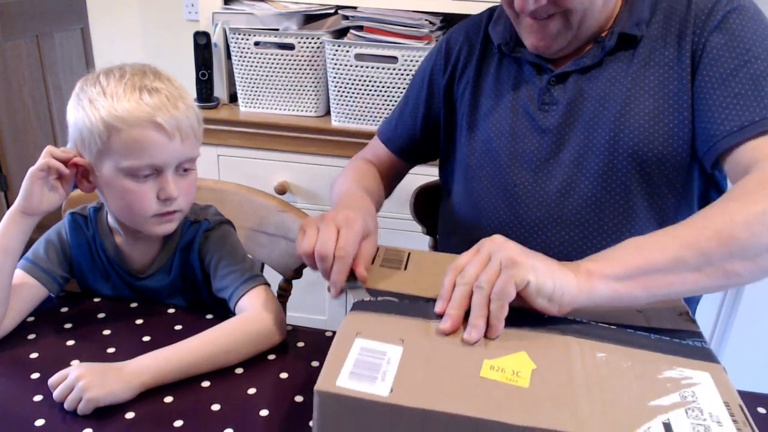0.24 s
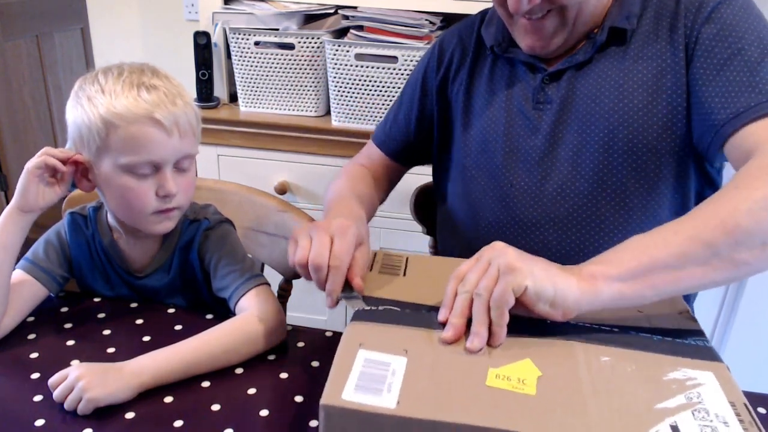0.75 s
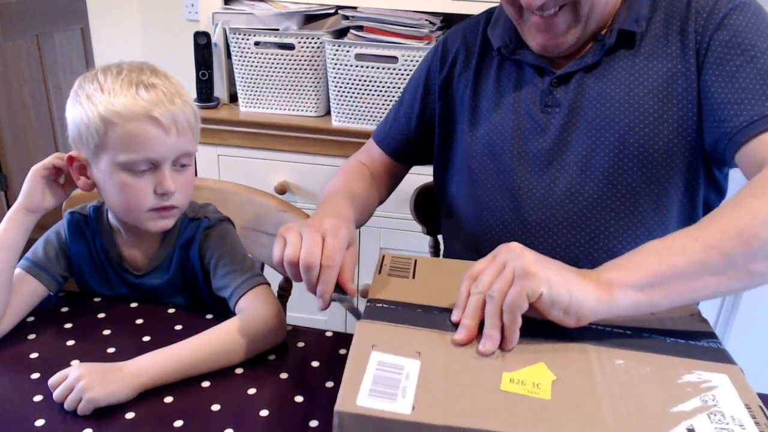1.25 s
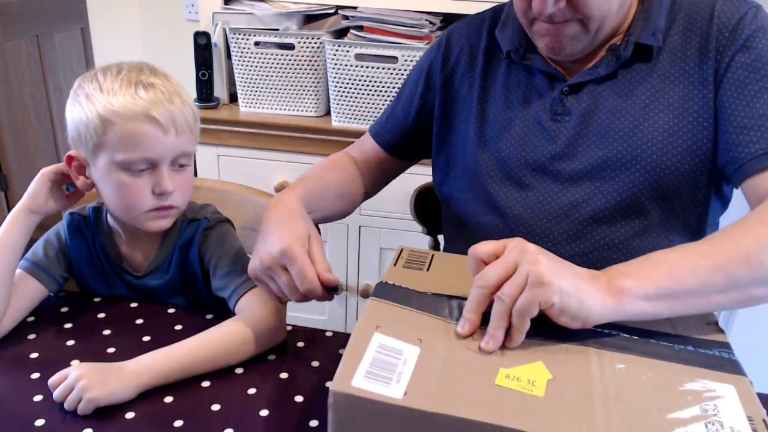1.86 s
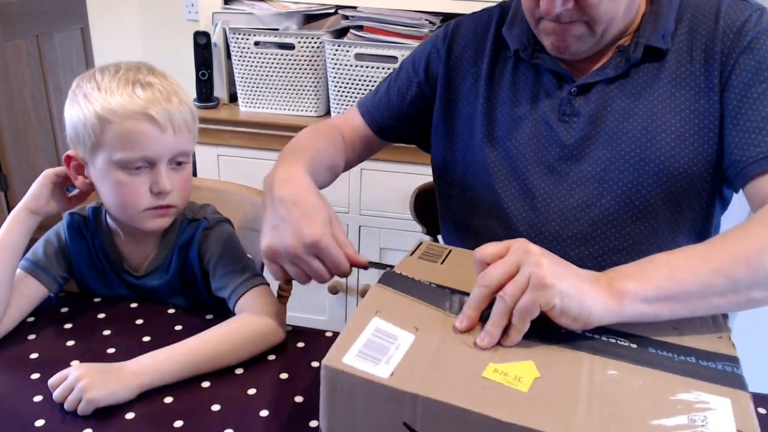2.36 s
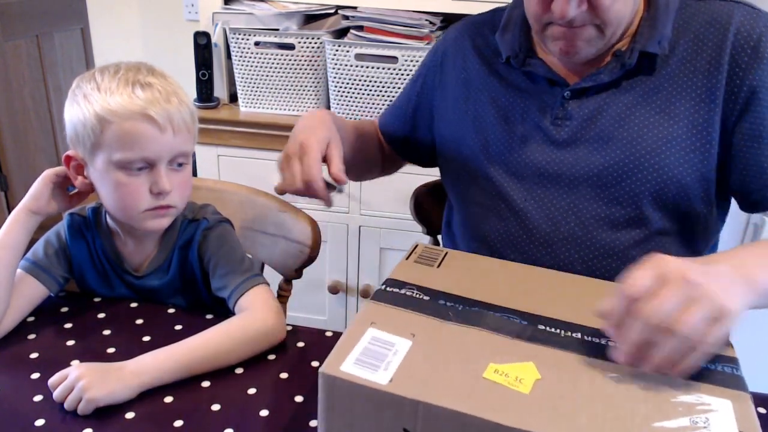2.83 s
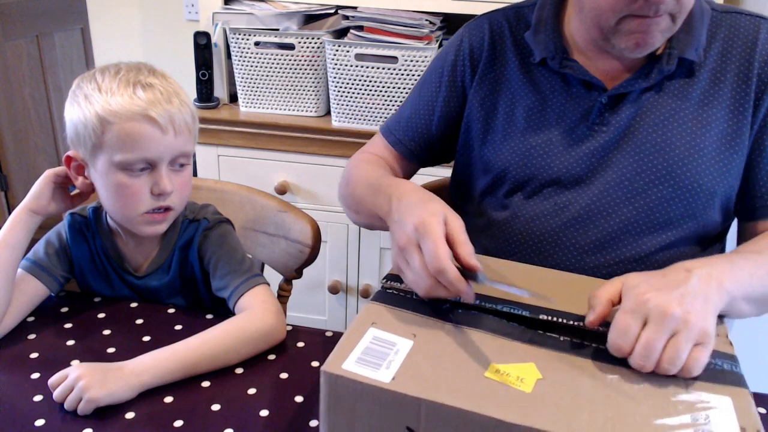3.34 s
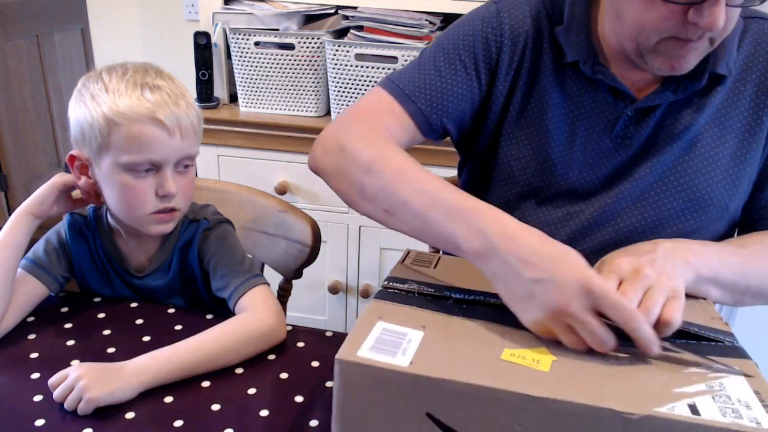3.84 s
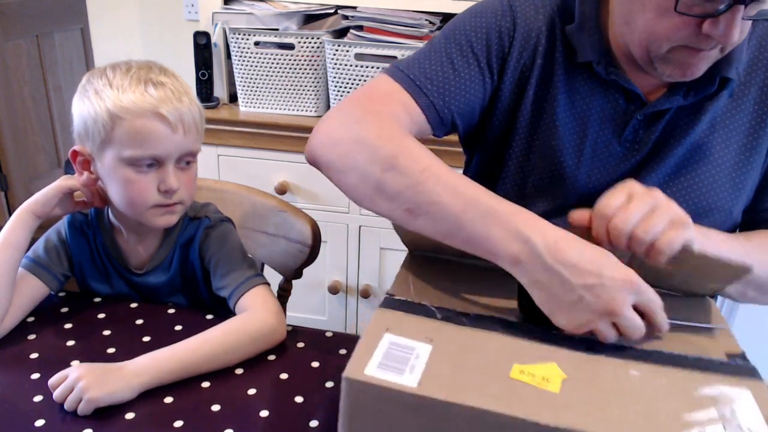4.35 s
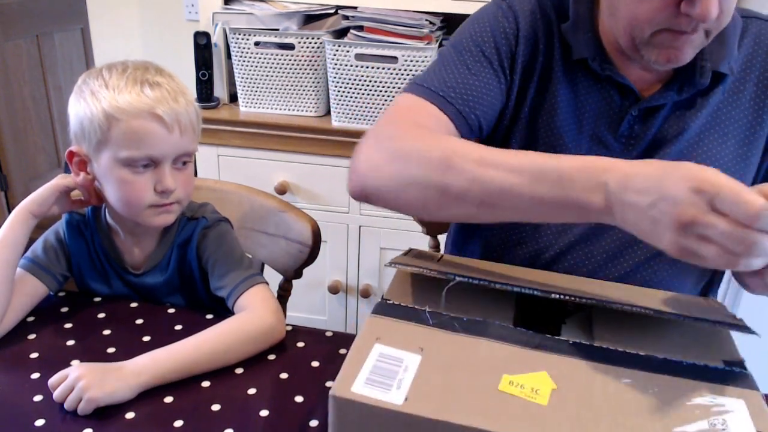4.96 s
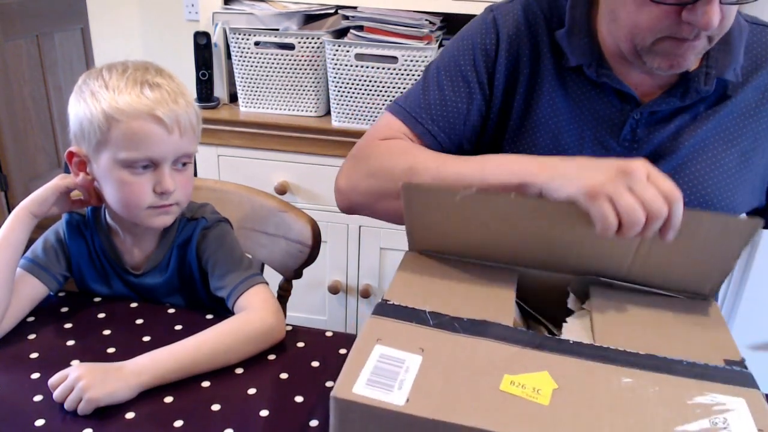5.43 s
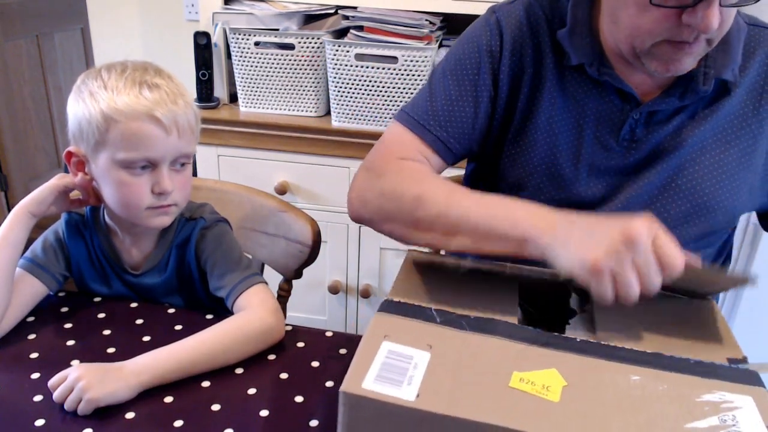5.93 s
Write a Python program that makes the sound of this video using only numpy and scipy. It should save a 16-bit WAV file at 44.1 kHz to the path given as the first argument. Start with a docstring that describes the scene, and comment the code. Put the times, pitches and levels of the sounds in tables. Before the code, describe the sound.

Close cardboard box opening: short knife rasps, popping tape, boomy knocks, a loud ripping crack, then quieter scrapes and thin folding knocks.

```python
"""A kitchen table in a small room: a knife saws through a cardboard box's packing tape and slits the seam,
then the flaps are torn free and folded back. Stick-slip strokes and sudden snaps drive one box:
its hollow booms, its walls knock, the board rasps, edge and tape hiss. Squeaks of narrow noise, a low
judder of summed sines and one dry, bright overload burst lie on top. Soft air and a faint hum run
throughout. A close pair of microphones hears it; the last folds and knocks sound thinner."""
import sys
import numpy as np
from scipy import signal
from scipy.fft import rfft, irfft, next_fast_len
from scipy.io import wavfile
from scipy.ndimage import uniform_filter1d

SR = 44100
rng = np.random.default_rng(int(sys.argv[2]) if len(sys.argv) > 2 else 0)


def materialize(psi):
    """Save the field psi as 16-bit PCM at rate SR to the path in sys.argv[1].

    A 1-D psi becomes a single channel; in a 2-D psi each row is a channel.
    """
    bounded = np.clip(np.atleast_2d(psi).T, -1, 1)
    quanta = np.round(bounded * 32767).astype(np.int16)
    wavfile.write(sys.argv[1], SR, quanta)


N = 272979
TIME = np.arange(N) / SR

# registers of the box, in order hollow, walls, board, edge: low_hz, high_hz
REGISTERS = [(36, 240), (240, 520), (520, 2400), (2400, 17000)]
# registers for snaps, with the top split into edge and tape: low_hz, high_hz
SNAP_REGISTERS = [(45, 240), (240, 520), (520, 2400), (2400, 8000), (8000, 17000)]

# Strokes press in, sag while held and let go. full_s is when the press is full.
# Levels are before each register's trim; boom (hollow), knock (walls) and hiss (edge) count from level_db (board).
# short sawing strokes at the end of the seam: full_s, hold_s, level_db, boom_db, knock_db, hiss_db
SAWING_STROKES = [(0.02, .03, -42.5, -3.5, 5.5, -1.5), (0.15, .025, -51.5, 1, -11, -3.5),
                  (0.255, 0.042, -49.5, 9.5, 12.5, -10), (0.38, .02, -57.5, -10, 2.5, -5.5),
                  (0.485, .025, -38.5, 6.5, 9.5, -2), (0.62, .05, -56, 6, 8.5, -4),
                  (0.725, .02, -43.5, 13.5, 1, -5), (0.84, .02, -52.5, 9, 1, 1),
                  (0.885, 0.0046, -44, 4, 0.5, -2.5), (0.965, .02, -37, 1, 6, -0.5),
                  (1.0, .015, -25.5, -6, 7.5, -4.5), (1.08, .025, -35.5, -26, -6, -2)]
# the blade pushed through the tape and drawn along it: full_s, hold_s, level_db, boom_db, knock_db, hiss_db
SLITTING_STROKES = [(1.14, 0.066, -21.5, -13, 3.5, -8), (1.235, 0.0069, -26.5, -4, -0.5, -8),
                    (1.285, 0.074, -42.5, -0.5, 0.5, -5), (1.435, 0.0033, -46, -1, 1, -13),
                    (1.548, 0.012, -40.5, 8.5, 20.5, -10), (1.615, 0.062, -41, -1, 9.5, -19),
                    (1.695, 0.0062, -27, -1, 2, -10.5), (1.84, 0.09, -56, -8, 6.5, -12.5),
                    (1.945, 0.054, -45.5, 1.5, 9, -17.5), (2.11, .07, -36, 10.5, 9.5, -11),
                    (2.2, 0.028, -19, 3.5, 6.5, -13), (2.26, 0.032, -33, 9, 6, -14.5),
                    (2.36, 0.049, -41.5, 14.5, 17.5, -8.5), (2.45, 0.075, -53.5, -6, -13, -6.5),
                    (2.56, 0.015, -39, -12, -7, -1), (2.61, 0.01, -58, 18.5, 5, -5.5),
                    (2.8, 0.039, -64.5, 11.5, -5, -11), (2.875, 0.0034, -48.5, 7, -4.5, -3.5),
                    (2.975, 0.076, -29.5, 2, 0.5, -13.5), (3.095, 0.082, -45, 0.5, -13, -5.5),
                    (3.205, 0.039, -42, 7, -6.5, -6.5), (3.28, .06, -53.5, -8, 0.5, -2),
                    (3.405, 0.063, -47, 1, 6.5, -5.5), (3.47, 0.079, -47, -13, 5, -1),
                    (3.58, 0.095, -60, 5.5, -6, 8.5), (3.745, 0.015, -46, 8.5, 7, -2),
                    (3.8, 0.066, -55.5, -11, -19, -0.5), (3.885, 0.028, -50, 10, 14, -7)]
# the flaps tear free and rub as they fold: full_s, hold_s, level_db, boom_db, knock_db, hiss_db
FLAP_STROKES = [(3.968, .012, -27, 0, -2, -10.5), (4.0, 0.027, -15.5, -6.5, -2.5, -11.5),
                (4.105, 0.028, -33, -13, 7.5, -6.5), (4.17, 0.013, -18.5, 5.5, 3.5, -14.5),
                (4.23, 0.052, -34.5, 10, 1, -14), (4.44, 0.014, -41, 0.5, 0.5, -13),
                (4.55, .03, -66, 6, -3, -5), (5.12, 0.023, -50, 15.5, -0.5, -3.5),
                (5.22, .05, -63, -2.5, 1, -2.5), (5.34, 0.067, -77, -3, 7, -5),
                (5.46, 0.028, -60.5, 1, 5.5, -19), (5.52, 0.11, -45.5, 0.5, 5, -14),
                (5.645, 0.075, -38, -5, 4, -8.5), (5.85, 0.03, -43.5, 16, -2, -10.5),
                (5.885, 0.011, -30, 11.5, 7, -12), (5.97, 0.1, -39.5, 5, 7, -7),
                (6.155, .04, -37.5, 13.5, 4, -4)]
# tape snaps and knocks, levels before trim; ring_hz is the struck panel's pitch:
# start_s, level_db, boom_db, knock_db, hiss_db, ring_hz, crackle_s
SNAPS = [(0.017, -38.5, -29, -23, -8, 1340, 0.0083), (0.483, -39, -5, 4, -6, 1080, 0.0037),
         (0.69, -62.5, 17, 24, 0, 880, 0.0029), (0.713, -33.5, -5, 1.5, -7, 1770, 0.011),
         (1.113, -22.5, 3, 1, -7.5, 2240, 0.0059), (1.127, -13.5, -2.5, -0.5, -12.5, 2370, 0.0011),
         (1.149, -27, -18, 8.5, -8.5, 654, 0.036), (1.157, -26, -4, 8.5, -10, 345, 0.0053),
         (1.238, -30.5, 16, -19, -4.5, 555, 0.0049), (1.317, -40.5, -25, 5.5, 1.5, 576, .004),
         (1.535, -59, 12, 15, -15, 324, .008), (1.66, -13, -14, -20, -9, 2295, .002),
         (1.685, -21, -10, -11.5, -4.5, 1100, 0.0011), (2.093, -39.5, 21, 9.5, -6, 345, 0.0087),
         (2.144, -31, 1, 10.5, -7.5, 530, .005), (2.186, -17.5, 0.5, 5.5, -11, 1025, 0.01),
         (2.203, -36, 23, 5, -4, 620, 0.0056), (2.223, -21, -15, -8, -16, 606, 0.0085),
         (2.345, -31.5, 15.5, 13, -15, 332, 0.0048), (2.948, -33, -26, -18, -6, 2310, 0.0058),
         (3.016, -19, -33, -5, -14, 623, 0.0075), (3.099, -38, -12, -21, -6, 840, .0015),
         (3.14, -46, -6, -5, -1, 770, 0.0034), (3.191, -27, -12, -22, -7.5, 810, 0.0041),
         (3.333, -61.5, -10, -1, 9.5, 2336, 0.0043), (3.507, -29.5, 3, 1.5, -15, 760, .006),
         (3.727, -50.5, 13.5, 0.5, 0, 1030, 0.02), (3.939, -24.5, 8.5, 5.5, 0.5, 1070, 0.0083),
         (3.947, -22, 14.5, 7.5, -15.5, 1060, 0.0079), (3.977, -15.5, 2.5, 5.5, 0, 864, .008),
         (3.985, -16.5, -6.5, -11.5, -4.5, 1080, 0.0033), (4.084, -14.5, -28.5, -3, -17.5, 923, .002),
         (4.15, -15.5, 4.5, -5, -14, 1220, 0.0041), (4.157, -18, -1.5, 7, -14, 925, 0.0074),
         (4.248, -43, 25, -12, -12, 945, 0.0023), (5.087, -54, 26.5, 14, -12, 670, 0.0077),
         (5.616, -38, 12.5, -4, -13.5, 960, 0.008), (5.706, -34, -6, -9, -14, 816, .003),
         (5.848, -45.5, 19, -7, -20, 660, 0.0058), (5.889, -39.5, 23.5, 8, -3, 590, 0.0056),
         (6.032, -33.5, -9, 5, -16.5, 570, 0.0021), (6.13, -56.5, 31, 26, -2, 950, 0.0021),
         (6.156, -32.5, 7, 5.5, -1.5, 594, 0.015)]
# the blade judders along the seam and slows: time_s, slips_per_s, level_db
JUDDER = [(3.507, 117, -47), (3.518, 133, -24.5), (3.549, 105, -29), (3.575, 86, -47), (3.60, 87, -36),
          (3.64, 99, -33.5), (3.68, 72, -40), (3.72, 82, -52)]
# rough squeaks where the blade or a flap edge binds, levels before a shared trim:
# centre_s, half_length_s, pitch_hz, width_hz, level_db
SQUEAKS = [(0.487, 0.0044, 6120, 600, -31.5), (0.99, 0.014, 6080, 900, -30.5),
           (1.625, 0.0024, 1790, 260, -33.5), (3.197, 0.0075, 3300, 305, -33.5),
           (3.201, 0.0081, 840, 120, -32), (3.483, 0.043, 730, 181, -41), (3.523, 0.028, 1360, 247, -44),
           (4.123, 0.028, 878, 194, -29), (5.111, 0.014, 654, 45, -45), (5.544, 0.017, 1433, 199.8, -53.5),
           (5.615, 0.0072, 1600, 350, -45.5), (5.706, 0.0015, 7540, 700, -43)]

# broad colour of the sawing contact: pitch_hz, level_db
SAW_COLOUR = [(15, -53), (25, -25.5), (64, -23.5), (216, -8.5), (307, -14), (351, -4), (402, -14),
              (541, -11), (789, -22), (2200, -25), (4550, -20.5), (6290, -17.5), (8470, -37.5),
              (9950, -31.5), (15700, -42.5)]
# broad colour of the slitting contact: pitch_hz, level_db
SLIT_COLOUR = [(15, -45.5), (25, -21), (76, -16), (140, -4.5), (291, -12.5), (342, -3.5), (448, -11.5),
               (619, -14), (879, -21.5), (1060, -21.5), (1280, -29), (1720, -28), (6290, -24),
               (8020, -34.5), (15700, -44.5)]
# broad colour of the rubbing flaps: pitch_hz, level_db
FLAP_COLOUR = [(15, -58.5), (25, -15), (148, 1), (199, -7.5), (307, -9.5), (342, -13.5), (413, -10),
               (486, -13.5), (708, -16.5), (1010, -17.5), (1820, -24.5), (2320, -34), (6460, -31),
               (8240, -45), (15700, -57)]
# broad colour of the snaps: pitch_hz, level_db
SNAP_COLOUR = [(15, -53.5), (25, -18.5), (70, -22.5), (144, -1.5), (179, -2), (342, -6), (402, -10.5),
               (653, -8), (708, -10.5), (1030, -11), (1350, -12), (3040, -31.5), (5500, -29.5), (8700, -41),
               (15700, -49)]
# resonances of the box: pitch_hz, width_hz, lift_db
BOX_MODES = [(111, 5.3, 0), (146.3, 15, 5.5), (220, 48, 2.5), (348, 33, 6.5), (534, 78, -3), (677, 14, 5),
             (840, 7.7, 6), (1030, 78, 3.5), (1115, 16, -0.5), (1490, 130, 3), (1880, 31, 4), (2254, 50, 6),
             (3390, 35, -0.5), (4900, 67, 5), (7160, 1400, 2.5)]

# reverberation time of the room: pitch_hz, t60_s
ROOM_T60 = [(100, 0.13), (500, 0.16), (2000, 0.23), (6000, 0.19), (15000, 0.22)]
# echo against direct sound: pitch_hz, level_db
ECHO_LEVEL = [(60, 7.5), (130, -17), (400, -8.5), (1200, -1), (4000, -1.5), (7000, -4.5), (9500, -8.5),
              (14000, -1.5)]
# left-right likeness of the echo: pitch_hz, correlation
ECHO_LIKENESS = [(60, 0.45), (130, 0.55), (400, 0.29), (1000, 0.4), (2200, -0.14), (5000, -0.18),
                 (14000, 0.85)]
# colour of the still air, relative: pitch_hz, level_db
AIR_COLOUR = [(15, -41), (25, -6.5), (70, 0), (107, 9.5), (170, -13.5), (216, -8), (241, -10.5),
              (371, -13.5), (1630, -22.5), (2960, -40), (15700, -35.5)]
# faint appliance hum: pitch_hz, level_db
HUM = [(107.7, -89.5), (145.3, -87.5), (215.3, -78.5)]

AIR_DB = -69.5
TAPE_BELOW_EDGE_DB = 15.5  # the thin sizzle of the tape follows the hiss of each snap, before trim
BURST_S, BURST_SPREAD_S, BURST_NOISE_DB = 3.988, 0.0029, -12.5  # noise level is before its high-pass
THIN_S, THIN_LOW_HZ = 5.9, 98  # from here on there is little deep bass
PAN_DB = -0.55  # left minus right: the box stands a little to the right
CUTOFF_HZ = 16000


def from_db(db):
    """Decibels to gain."""
    return 10 ** (np.asarray(db) / 20)


def at_hz(points, hz):
    """Read a spectrum on a log-frequency axis."""
    points = np.array(points)
    return np.interp(np.log(np.maximum(hz, 1)), np.log(points[:, 0]), points[:, 1])


def gate(s, fade_s):
    """One from the first to the last of the times s, with short ramps outside."""
    return np.interp(TIME, [s[0] - fade_s, s[0], s[-1], s[-1] + fade_s], [0, 1, 1, 0])


def drift(per_s):
    """Random wander: straight lines between per_s normal draws each second."""
    return np.interp(TIME * per_s, np.arange(1000), rng.standard_normal(1000))


def resonate(x, hz, width_hz):
    """One resonance, gain about one at its top."""
    r = np.exp(-np.pi * width_hz / SR)
    feedback = [1, -2 * r * np.cos(2 * np.pi * hz / SR), r * r]
    return signal.lfilter(np.array([1, 0, -1]) * (1 - r * r) / 2, feedback, x)


def two_ears(mid, side, alike):
    """Left and right from two unrelated signals, with a given likeness."""
    alike = np.clip(alike, -.99, .99)
    middle = np.sqrt(1 + alike) * mid
    width = np.sqrt(1 - alike) * side * np.array([[1], [-1]])
    return (middle + width) / np.sqrt(2)


def room_tone(alike):
    """Still air is coloured noise in both ears; the hum is a few steady sines."""
    size = next_fast_len(N, True)
    hz = np.arange(size // 2 + 1) * SR / size
    white = rfft(rng.standard_normal((2, size)))
    air = irfft(white * from_db(at_hz(AIR_COLOUR, hz)), size)[:, :N]
    hum = sum(np.sqrt(2) * from_db(db) * np.sin(2 * np.pi * f * TIME) for f, db in HUM)
    return from_db(AIR_DB) * two_ears(*air / np.std(air), alike) + hum


def room(lag_s, build_s=0.0022, size=16384):
    """Stereo response: direct sound, reaching the left lag_s later, then echoes dying band by band."""
    t, hz = np.arange(size) / SR, np.arange(size // 2 + 1) * SR / size
    white = rfft(rng.standard_normal((2, size)))
    edges = np.geomspace(25, 20000, 19)
    arrival_s = np.array([[lag_s], [0]]) + 16 / SR
    out = irfft(np.exp(-2j * np.pi * hz * arrival_s))
    for low, high in zip(edges, edges[1:]):
        centre = np.sqrt(low * high)
        decay = from_db(-60 * t / at_hz(ROOM_T60, centre))
        build = 1 - np.exp(-t / build_s)
        tail = irfft(white * ((hz >= low) & (hz < high))) * decay * build
        # energy in step with the band's share of the direct click
        tail *= np.sqrt(2 * (high - low) / SR / np.sum(tail ** 2, axis=1, keepdims=True))
        out += from_db(at_hz(ECHO_LEVEL, centre)) * two_ears(*tail, at_hz(ECHO_LIKENESS, centre))
    return out


def box_responses(colour, space, registers=REGISTERS, size=16384):
    """How each register of the box answers one click, heard through the room; unit energy."""
    hz = np.arange(size // 2 + 1) * SR / size
    modes_db = sum(lift / (1 + (2 * (hz - f) / width) ** 2) for f, width, lift in BOX_MODES)
    shape_db = at_hz(colour, hz) + modes_db
    # minimum phase: the board rings only after it is touched
    cepstrum = irfft(np.log(from_db(shape_db)))
    ring = irfft(np.exp(rfft(2 * cepstrum[:size // 2], size)))
    heard = signal.fftconvolve(space, ring[None], axes=1)[:, :size]
    parts = [signal.sosfilt(signal.butter(3, band, "band", fs=SR, output="sos"), heard)
             for band in registers]
    return [part / np.sqrt(np.sum(part.mean(axis=0) ** 2)) for part in parts]


def sound_of(forces, responses):
    """Drive each register with its own force."""
    return sum(signal.oaconvolve(force[None], response, axes=1)[:, :N]
               for force, response in zip(forces, responses))


def stick_slip(per_s, spread_db, even_s, smooth, patchy_db):
    """Fibres catch and let go: uneven clicks over a smooth rub, held near a mean power of one."""
    sizes = from_db(spread_db * np.minimum(rng.exponential(1, N), 5)) * rng.choice([-1, 1], N)
    clicks = sizes * (rng.random(N) < per_s / SR)
    force = clicks / np.std(clicks) + smooth * rng.standard_normal(N)
    # the contact crosses nodes and bellies of the board, so its resonances swell and fade;
    # each swelling resonance is taken from the plain force, then all are added
    pitches = np.geomspace(560, 4200, 24) * rng.uniform(.97, 1.03, 24)
    swells = sum((from_db(patchy_db * drift(per_s=22)) - 1) * resonate(force, hz, 0.047 * hz)
                 for hz in pitches)
    force = force + swells
    return force / np.sqrt(uniform_filter1d(force ** 2, max(int(even_s * SR), 8)) + 1e-9)


def pressure_of(strokes, attack_s, sag_db_per_s, release_db_per_s, resting_db, lead_s, hiss_faster):
    """Force on each register: strokes swell, sag while held and die away over a bare resting rub."""
    resting = from_db(resting_db) * gate([strokes[0][0], strokes[-1][0]], fade_s=0.04)
    power = np.tile(resting ** 2, (4, 1))
    # the hand moves the box a moment before the contact slips; the hiss stops first
    lead = lead_s * np.array([[1], [.5], [0], [0]])
    release = release_db_per_s * np.array([[1], [1], [1], [hiss_faster]])
    for s, hold_s, db, boom_db, knock_db, hiss_db in strokes:
        near = np.abs(TIME - s) < .5
        age = TIME[near] - s + lead
        swell = np.clip(1 + age / attack_s, 0, 1) ** 2
        fall_db = sag_db_per_s * np.maximum(age, 0) + release * np.maximum(age - hold_s, 0)
        levels_db = db + np.array([[boom_db], [knock_db], [0], [hiss_db]])
        power[:, near] += (swell * from_db(levels_db - fall_db)) ** 2
    return np.sqrt(power)


def scrape(pressure, slips, responses, trim_db, steady_s=0.069):
    """The strokes press the slipping contact into the box."""
    # each register is evened out, so that its loudness follows the stroke
    swings = [signal.oaconvolve(slips, response.mean(axis=0))[:N] for response in responses]
    power = uniform_filter1d(np.square(swings), max(int(steady_s * SR), 8), axis=1)
    evened = slips / np.sqrt((np.abs(power) + .1) / 1.1)
    return sound_of(pressure * from_db(trim_db)[:, None] * evened, responses)


def sawing():
    """Short strokes of dense stick-slip; the blade snags and flutters in the tape."""
    slips = stick_slip(per_s=2400, spread_db=3.0, even_s=0.034, smooth=0.5, patchy_db=4)
    slips = slips * from_db(1.6 * drift(per_s=140))
    push = pressure_of(SAWING_STROKES, attack_s=0.05, sag_db_per_s=57, release_db_per_s=475,
                       resting_db=-76.5, lead_s=0.012, hiss_faster=2.7)
    box = box_responses(SAW_COLOUR, room(lag_s=.00001))
    return scrape(push, slips, box, trim_db=[0.85, .5, 0.03, -0.35])


def snaps(trim_db, crackle, ring_db, ring_width_hz, typical_s=0.0021, size=4096):
    """A snap is a sharp release and a brief crackle of tearing fibres, on different spots of the box."""
    spots = [box_responses(SNAP_COLOUR, room(lag_s=lag), SNAP_REGISTERS)
             for lag in (.00002, .00004, .00006)]
    out, t = np.zeros((2, N)), np.arange(size) / SR
    for k, (snap, fibres) in enumerate(zip(SNAPS, rng.standard_normal((len(SNAPS), size)))):
        s, level_db, boom_db, knock_db, hiss_db, ring_hz, length_s = snap
        levels = level_db + np.array([boom_db, knock_db, 0, hiss_db, hiss_db - TAPE_BELOW_EDGE_DB])
        age = t / length_s
        burst = fibres * np.sqrt(age) * np.exp(-1.5 * age)
        burst /= np.linalg.norm(burst)
        start = round(s * SR)
        for response, db, trim, share in zip(spots[k % len(spots)], levels, trim_db, crackle):
            # the longer the tear, the less of it is in the first release
            torn = share * np.sqrt(length_s / typical_s)
            force = ((t == 0) + torn * burst) / np.hypot(1, torn)
            force = force + from_db(ring_db) * resonate(force, ring_hz, ring_width_hz)
            hit = signal.fftconvolve(force[None], response, axes=1)[:, :N - start]
            out[:, start:start + hit.shape[1]] += from_db(db + trim) * hit
    return out


def squeaks(trim_db):
    """Slips bunch up around one pitch for a moment: narrow noise heard through the room alone."""
    space = room(lag_s=.00004)
    out = np.zeros(N)
    for s, half_s, hz, width_hz, db in SQUEAKS:
        tone = resonate(resonate(rng.standard_normal(N), hz, width_hz), hz, width_hz)
        swell = np.exp(-.5 * ((TIME - s) / half_s) ** 2)
        out += from_db(db + trim_db) * swell * tone / np.std(tone)
    return sound_of([out], [space / np.linalg.norm(space.mean(axis=0))])


def slitting():
    """Sparser stick-slip as the blade is pushed through and drawn along the seam."""
    slips = stick_slip(per_s=1000, spread_db=2.5, even_s=0.018, smooth=0.27, patchy_db=5.5)
    push = pressure_of(SLITTING_STROKES, attack_s=0.039, sag_db_per_s=44.5, release_db_per_s=370.5,
                       resting_db=-83, lead_s=.008, hiss_faster=1.3)
    box = box_responses(SLIT_COLOUR, room(lag_s=.00003))
    return scrape(push, slips, box, trim_db=[.3, 0.4, -.3, -0.42])


def judder(overtone_db, fade_s):
    """Regular slips of the blade pump the lid: a low, mostly falling tone with two overtones."""
    s, hz, db = np.transpose(JUDDER)
    phase = 2 * np.pi * np.cumsum(np.interp(TIME, s, hz)) / SR
    wave = sum(from_db(overtone_db * k) * np.sin((k + 1) * phase) for k in range(3))
    return np.sqrt(2) * wave * gate(s, fade_s) * from_db(np.interp(TIME, s, db))


def flaps():
    """Stick-slip of card tearing free and rubbing as it folds."""
    slips = stick_slip(per_s=1100, spread_db=3.0, even_s=0.0094, smooth=0.27, patchy_db=5.0)
    push = pressure_of(FLAP_STROKES, attack_s=0.052, sag_db_per_s=29.5, release_db_per_s=352,
                       resting_db=-87.5, lead_s=.003, hiss_faster=1.2)
    box = box_responses(FLAP_COLOUR, room(lag_s=.00008))
    return scrape(push, slips, box, trim_db=[.6, 0.39, -0.2, -.3])


def overload_burst(low_hz, alike):
    """A few milliseconds of bright, dry noise where loud snaps overload the microphone."""
    bright = signal.butter(2, low_hz, "high", fs=SR, output="sos")
    noise = signal.sosfilt(bright, rng.standard_normal((2, N)))
    swell = np.exp(-.5 * ((TIME - BURST_S) / BURST_SPREAD_S) ** 2)
    return from_db(BURST_NOISE_DB) * swell * two_ears(*noise, alike)


def thin_bass(box):
    """The last folds and knocks sound thinner, with little deep bass: a high-pass fades in."""
    thin = signal.sosfilt(signal.butter(3, THIN_LOW_HZ, "high", fs=SR, output="sos"), box)
    thinned = gate([THIN_S, TIME[-1]], fade_s=.1)
    return box + thinned * (thin - box)


def scene():
    """Sawing, slitting, flaps and snaps share one box, each with its own path to the microphones."""
    # per register: hollow, walls, board, edge, tape
    hits = snaps(trim_db=[27.5, 25.2, 24.46, 29.1, 29], crackle=[0.35, 0.55, 2.6, 5.3, 1.7],
                 ring_db=9.5, ring_width_hz=53)
    box = thin_bass(sawing() + hits + slitting() + flaps())
    box = box + squeaks(trim_db=-0.5)
    box = box + judder(overtone_db=-13.0, fade_s=0.0025)
    box = box + overload_burst(low_hz=7000, alike=.5)
    return box * from_db(PAN_DB * np.array([[.5], [-.5]])) + room_tone(alike=0.52)


def record(dry):
    """Peaks beyond 0.95 are clipped flat, then the top is cut steeply."""
    clipped = np.clip(dry, -.95, .95)
    return signal.sosfilt(signal.ellip(10, .2, 70, CUTOFF_HZ, fs=SR, output="sos"), clipped)


dry = scene()
out = record(dry)
materialize(out)
```